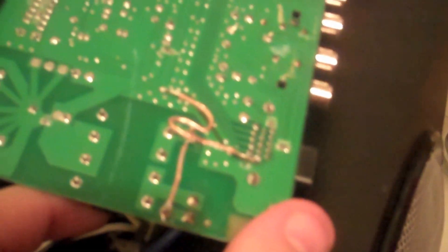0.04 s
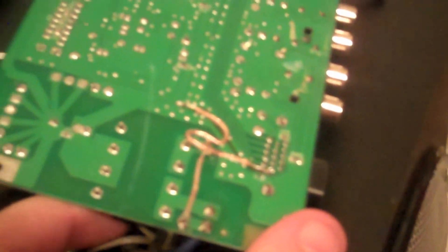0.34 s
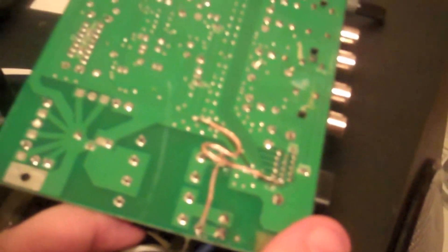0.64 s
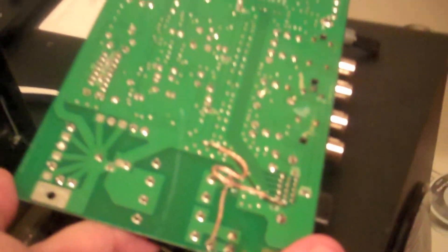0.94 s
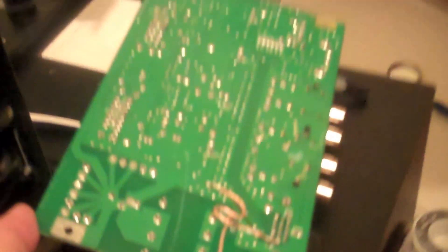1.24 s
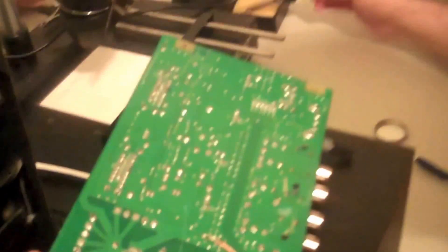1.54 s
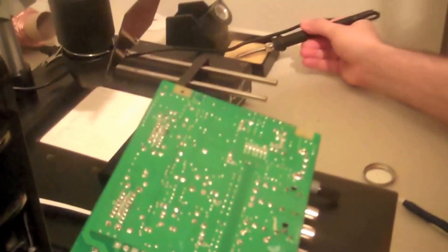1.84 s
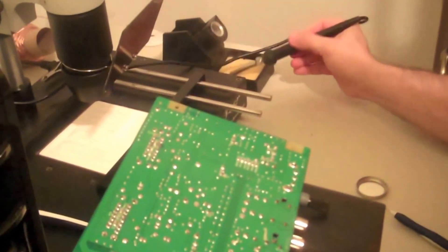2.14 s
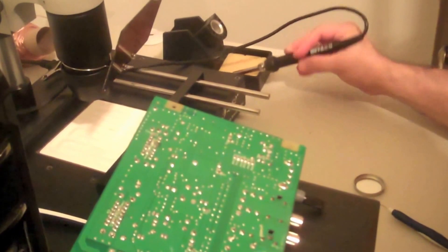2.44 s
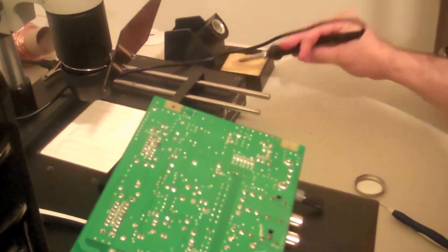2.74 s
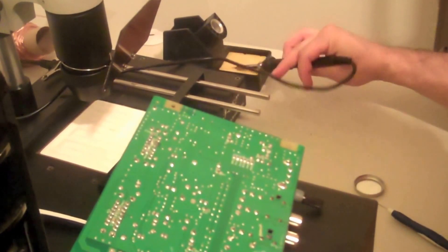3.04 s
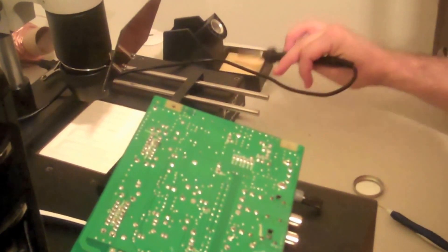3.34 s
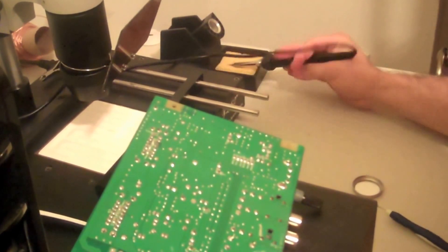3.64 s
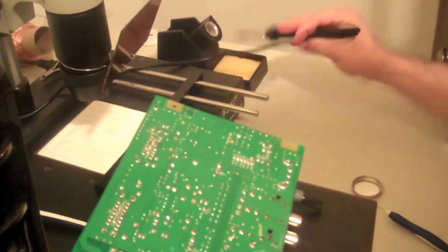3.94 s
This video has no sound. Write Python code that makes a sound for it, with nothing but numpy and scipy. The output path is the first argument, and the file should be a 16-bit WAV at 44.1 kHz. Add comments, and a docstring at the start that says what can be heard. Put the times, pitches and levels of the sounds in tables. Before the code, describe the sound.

A hot soldering iron sizzles on a damp sponge in short wipes, with light knocks.

```python
"""A workbench in a small room, where a hot soldering iron is wiped five times on a damp sponge in its stand.
Water flashes to steam on the tip and sizzles, more weakly as the tip cools. Presses and lifts knock the
stand on the bench and excite the modes of both; the iron clicks, and the last wipe drags along the stand.
Bench equipment whines and hisses throughout."""
import sys
import numpy as np
from scipy import signal
from scipy.fft import rfft, irfft
from scipy.io import wavfile

SR = 44100
rng = np.random.default_rng(int(sys.argv[2]) if len(sys.argv) > 2 else 0)


def log_audio(samples):
    """Write samples as a 16-bit WAV file to the path given in sys.argv[1]."""
    # one column per channel
    frames = np.atleast_2d(samples).T
    # limit to full scale, then quantise
    limited = np.clip(frames, -1, 1)
    pcm = np.round(limited * 32767).astype(np.int16)
    wavfile.write(sys.argv[1], SR, pcm)


N = 176400
T = np.arange(N) / SR

# Air noise of the equipment: frequency_hz, relative_db
AIR_SPECTRUM = [(25, -20), (85, -8.5), (125, -1.5), (175, -9.5), (320, -2), (480, -5.5), (760, 7.5),
                (1170, -6.5), (1520, 0), (1780, -2.5), (2080, 0), (2550, -3.5), (2950, -0.5), (3300, -7.5),
                (3700, -0.5), (4500, -6), (5600, -5.5), (6600, 2), (8300, -8), (10000, -21.5), (14200, -32)]
# Envelopes of the two strong whines: time_s, level_db
LOW_WHINE_LEVELS = [(0, -42), (0.8, -42), (1.5, -47), (2.1, -49), (2.8, -47), (4, -45)]
HIGH_WHINE_LEVELS = [(0.1, -45), (0.32, -53), (0.46, -44), (1.7, -52), (2.7, -46), (4, -45)]
# Fainter whines: pitch_hz, level_db
FAINT_WHINES = [(2037, -54.5), (2910, -60.5), (3637, -55.5), (4028, -62.5)]
# Blows of the stand on the bench: start_s, force_db, bench_gain_db, low_cut_hz, rattle_s
STAND_KNOCKS = [(0.508, -52, 18, 80, 0.0136), (0.76, -27.5, -5, 200, 0.012),
                (0.8318, -10.5, -12.5, 173, 0.015), (1.361, -21, -5, 110, 0.028),
                (1.6372, -15, -6.5, 233, 0.021), (2.017, -26.5, -2.5, 80, 0.02),
                (2.13, -26, -3, 169, 0.0077), (2.262, -38, 5, 90, 0.02), (2.336, -22.5, -6, 150, .016),
                (2.408, -24.5, -5, 130, 0.017), (2.601, -23.5, -2.5, 110, 0.02),
                (2.625, -33.5, 6, 80.6, 0.019)]
# Drags of the tip along the stand: peak_s, swell_and_fade_s, force_db
TIP_RUBS = [(3.494, 0.017, -62), (3.827, 0.036, -66)]
# Modes of the bench top and of the stand: pitch_hz, gain_db, t60_s
BENCH_MODES = [(102, -7, 0.061), (134.6, -2, 0.094), (247, 0, 0.074), (308, 2, 0.098), (392, -3.5, 0.082)]
STAND_MODES = [(584, -7, 0.19), (718, 1.5, 0.036), (873, -2, 0.047), (1390, 1.5, 0.0069)]
# Hard touches of the iron: start_s, level_db, ring_hz, ring_gain_db
IRON_CLICKS = [(0.4314, -32.5, 3600, 0.5), (0.4385, -50, 810, 14), (0.842, -30.5, 3630, -8),
               (1.640, -37, 1670, 1), (2.02, -36.5, 6600, -12), (2.1246, -29, 1370, -5),
               (2.604, -31, 2950, -4), (2.626, -37.5, 3640, -2), (3.483, -37.5, 1960, -8)]
# Spectra of a click and of the sizzle: frequency_hz, relative_db
CLICK_SPECTRUM = [(170, -6), (800, 5), (2300, 1.5), (3300, 0.5), (5000, -4.5), (7500, 1), (10000, -24),
                  (14000, -33)]
SIZZLE_SPECTRUM = [(1400, -20), (1900, -8.5), (2300, -9), (2750, -12), (4300, -4.5), (5200, -5),
                   (6600, -0.5), (8300, -2), (10000, -13.5), (14200, -22.5)]
# Narrow resonances in the sizzle: pitch_hz, relative_db
SIZZLE_MODES = [(4045, -21.5), (4560, -18.5), (6275, -14.5), (7420, -20), (7965, -20)]
# Contacts of tip and sponge: start_s, end_s, attack_s, start_gain_db, end_gain_db, spit_hz
SPONGE_STROKES = [(0.802, 0.91, 0.0018, -33.5, -31.5, 7800), (0.897, 1.117, 0.014, -34, -35.5, 7370),
                  (1.09, 1.328, 0.0093, -32.5, -30, 6860), (1.564, 1.913, 0.052, -28.5, -33.5, 7170),
                  (2.191, 2.589, 0.028, -32.5, -35.5, 7370), (2.813, 3.157, 0.07, -33.5, -43.5, 7600),
                  (3.436, 3.89, 0.008, -43.5, -46, 6460)]
# Likeness of left and right, for the room and the sizzle: frequency_hz, correlation (-1 to 1)
ROOM_COHERENCE = [(30, 0.55), (130, 0.94), (1000, 0.9), (2900, 0.77), (6400, 0.32)]
SIZZLE_COHERENCE = [(2700, 1), (4400, 0.27), (7000, 0.69), (10000, 0.23)]
# Imbalance of the microphone pair: frequency_hz, left_minus_right_db
MIC_BALANCE = [(60, -2.5), (1200, 0.5), (5200, -0.5), (6400, -5.5), (7300, 0.5), (8400, 13.5), (10000, 5),
               (14000, 15)]


def from_db(db):
    """Amplitude grows tenfold for every 20 decibels."""
    return 10 ** (np.asarray(db) / 20)


def unit_rms(x):
    """Division by the root mean square gives unit power."""
    return x / np.sqrt(np.mean(x ** 2) + 1e-20)


def on_bins(table, size=N):
    """Interpolation in log frequency gives a table's value at each Fourier bin."""
    hz, value = np.transpose(table)
    return np.interp(np.log(np.arange(size // 2 + 1) * SR / size + 1), np.log(hz), value)


def colour(x, spectrum):
    """Spectral shaping: each frequency is weighted, and the result has unit power."""
    return unit_rms(irfft(rfft(x) * from_db(on_bins(spectrum)), N))


def spread(pair, coherence):
    """Partial coherence: a weighted sum and difference of unrelated signals form left and right."""
    size = pair.shape[1]
    alike = np.clip(on_bins(coherence, size), -1, 1)
    mid, side = rfft(pair)
    return irfft(np.sqrt(1 + alike) * mid + np.sqrt(1 - alike) * side * [[1], [-1]], size)


def noise(coherence=ROOM_COHERENCE):
    """White noise has equal power per hertz, here in two partly coherent channels."""
    return spread(rng.standard_normal((2, N)), coherence)


def drift(rate_hz):
    """Low-passed noise wanders slowly, with unit power."""
    hz = np.arange(N // 2 + 1) * SR / N
    return unit_rms(irfft(rfft(rng.standard_normal(N)) / (1 + (hz / rate_hz) ** 2), N))


def resonator(force, hz, t60_s):
    """A damped oscillator answers an impulse with an exponentially decaying sinusoid."""
    radius = np.exp(-np.log(1000) / (t60_s * SR))
    angle = 2 * np.pi * hz / SR
    return signal.lfilter([.5, 0, -.5], [1, -2 * radius * np.cos(angle), radius ** 2], force + 1e-18)


def reverberate(x, t60_s, wet_db, delay_s, coherence=ROOM_COHERENCE):
    """Reverberation: dense, exponentially decaying reflections follow the direct sound."""
    t = T[:SR // 2]
    decay = np.exp(-np.log(1000) * t / t60_s) * (t > delay_s)
    tail = spread(rng.standard_normal((2, len(t))) * decay, coherence)
    tail /= np.sqrt(np.sum(tail ** 2) / 2)
    return x + from_db(wet_db) * signal.fftconvolve(np.atleast_2d(x), tail, axes=1)[:, :N]


def whine(hz, level_db, settle_s=0.55, waver_hz=1.19, waver_db=1.26):
    """Random frequency and amplitude modulation make a tone waver; it starts sharp and settles."""
    pitch_hz = hz * (1 + 0.0046 * np.exp(-T / settle_s)) + waver_hz * drift(15.4)
    lag_s = np.array([[3e-5], [0]])  # the equipment stands to the right
    phase = 2 * np.pi * (np.cumsum(pitch_hz) / SR - hz * lag_s)
    return np.sqrt(2) * from_db(level_db + waver_db * drift(17)) * np.sin(phase)


def equipment(air_db=-42):
    """Superposition: running equipment adds tonal whines to broadband air noise."""
    out = from_db(air_db) * colour(noise(), AIR_SPECTRUM)
    for hz, levels in ((1018.8, LOW_WHINE_LEVELS), (2328.4, HIGH_WHINE_LEVELS)):
        out += whine(hz, np.interp(T, *np.transpose(levels)))
    return out + sum(whine(hz, db) for hz, db in FAINT_WHINES)


def cushion(force, low_cut_hz, high_cut_hz=1070):
    """The sponge's compliance dulls each contact; each has its own bass cut, from thud to thin knock."""
    soft = signal.lfilter(*signal.butter(1, high_cut_hz, fs=SR), force + 1e-18)
    return signal.lfilter(*signal.butter(2, low_cut_hz, "high", fs=SR), soft)


def stand_and_bench(blow_gain_db=-10, rattles=4, rattle_db=-10.5, bench_delay_s=0.00465):
    """Modal vibration: rattling blows and sliding friction drive the stand and the bench under it."""
    on_stand, on_bench = np.zeros(N), np.zeros(N)
    for start_s, force_db, bench_db, low_cut_hz, rattle_s in STAND_KNOCKS:
        blow = np.zeros(N)
        blow[int(start_s * SR)] = 1
        after_s = rattle_s * (np.arange(rattles) + rng.uniform(0.548, 1.59, rattles)) / rattles
        blow[((start_s + after_s) * SR).astype(int)] += from_db(rattle_db) * rng.choice([-1, 1], rattles)
        blow = from_db(force_db + blow_gain_db) * cushion(blow, low_cut_hz)
        on_stand += blow
        on_bench += from_db(bench_db) * np.roll(blow, int(bench_delay_s * SR))  # the heavy bench lags
    pressure = sum(from_db(db) * np.exp(-np.abs(T - peak_s) / fade_s) for peak_s, fade_s, db in TIP_RUBS)
    friction = pressure * cushion(rng.standard_normal(N), low_cut_hz=223)
    on_bench += friction
    on_stand += from_db(2) * friction
    wood = sum(from_db(db) * resonator(on_bench, hz, t60_s) for hz, db, t60_s in BENCH_MODES)
    metal = sum((-1) ** k * from_db(db) * resonator(on_stand, hz, t60_s)
                for k, (hz, db, t60_s) in enumerate(STAND_MODES))
    bass_cut = signal.butter(2, 75, "high", fs=SR, output="sos")  # the knocks carry little below 75 Hz
    return signal.sosfilt(bass_cut, wood + metal)


def iron_clicks(crack_t60_s=0.14, ring_t60_s=0.053):
    """Hard impact: each touch of the iron excites a broadband crack and one damped metallic mode."""
    out, crack = 0, colour(noise(), CLICK_SPECTRUM)
    for start_s, level_db, ring_hz, ring_db in IRON_CLICKS:
        age_s = np.maximum(T - start_s, 0)
        snap = crack * (T >= start_s) * np.exp(-np.log(1000) * age_s / crack_t60_s)
        ring = np.sin(2 * np.pi * ring_hz * age_s) * np.exp(-np.log(1000) * age_s / ring_t60_s)
        out += from_db(level_db) * (snap + from_db(ring_db) * np.sqrt(2) * ring)
    return out


def boiling(start_s, end_s, attack_s, start_db, end_db, release_s=0.025, simmer_db=-16, simmer_s=0.28):
    """Heat conduction sustains boiling during contact; water left on the lifted tip simmers away."""
    attack = 1 - np.exp(-np.maximum(T - start_s, 0) / attack_s)
    lifted_s = np.maximum(T - end_s, 0)
    simmer = from_db(simmer_db) * np.exp(-lifted_s / simmer_s)
    release = np.maximum(np.exp(-lifted_s / release_s), simmer)
    return attack * release * from_db(np.interp(T, [start_s, end_s], [start_db, end_db]))


def bubble_pops(pops_per_s=2500, spread_db=2.5):
    """Shot noise: tiny bubbles burst independently, each an impulse of random size and sign."""
    sizes = from_db(spread_db * np.minimum(rng.exponential(1, (2, N)), 5)) * rng.choice([-1, 1], (2, N))
    bursts = rng.random((2, N)) < pops_per_s / SR
    return colour(spread(sizes * bursts, SIZZLE_COHERENCE), SIZZLE_SPECTRUM)


def sizzle(pops_db=-4.5, steam_db=-4, spit_db=-8, spit_width_hz=910, ring_width_hz=12, flutter_db=0.5):
    """Flash boiling: steam hisses and bubbles burst, with a spitting band that differs by stroke."""
    pops = from_db(pops_db) * bubble_pops()
    steam = from_db(steam_db) * colour(noise(SIZZLE_COHERENCE), SIZZLE_SPECTRUM)
    ring_t60_s = np.log(1000) / (np.pi * ring_width_hz)
    rings = sum(from_db(db) * unit_rms(resonator(noise(), hz, ring_t60_s)) for hz, db in SIZZLE_MODES)
    power, spit = 0, 0
    for *stroke, spit_hz in SPONGE_STROKES:
        vigour = boiling(*stroke)
        edges_hz = [spit_hz - spit_width_hz / 2, spit_hz + spit_width_hz / 2]
        band = signal.butter(2, edges_hz, "band", fs=SR, output="sos")
        spit += vigour * unit_rms(signal.sosfilt(band, noise(SIZZLE_COHERENCE)))
        power += vigour ** 2  # overlapping strokes add in power
    flutter = from_db(flutter_db * drift(20))
    return flutter * (np.sqrt(power) * (steam + pops + rings) + from_db(spit_db) * spit)


def scene():
    """The sources add linearly; nearby tools reflect the sizzle, and the room reflects the knocks."""
    wiping = reverberate(sizzle(), t60_s=0.088, wet_db=-1.5, delay_s=0, coherence=SIZZLE_COHERENCE)
    background = equipment()
    knocks = reverberate(stand_and_bench(), t60_s=0.25, wet_db=-4, delay_s=0.00872)
    return background + knocks + iron_clicks() + wiping


def record(dry, left_lag_s=2.1e-5, stopband_hz=14750):
    """Two microphones differ in frequency response and arrival time; a steep low-pass limits the band."""
    hz = np.arange(N // 2 + 1) * SR / N
    balance = from_db(on_bins(MIC_BALANCE) * [[.5], [-.5]])
    lag = np.exp(-2j * np.pi * hz * left_lag_s * [[1], [0]])
    low_pass = signal.cheby2(20, 70, stopband_hz, fs=SR, output="sos")
    return signal.sosfilt(low_pass, irfft(rfft(dry) * balance * lag, N))


dry = scene()
out = record(dry)
log_audio(out)
```